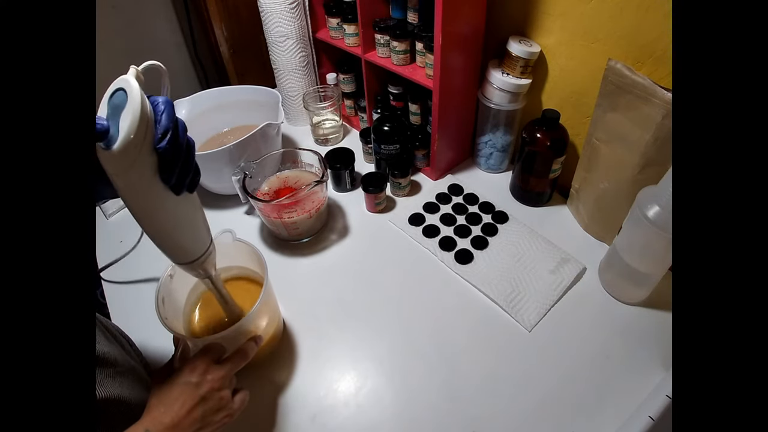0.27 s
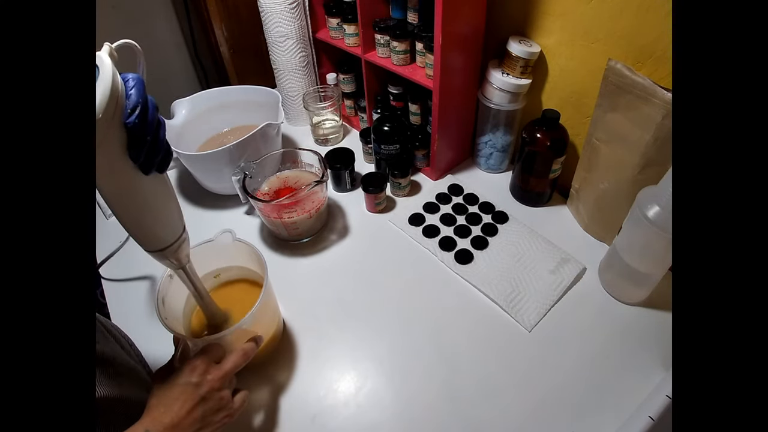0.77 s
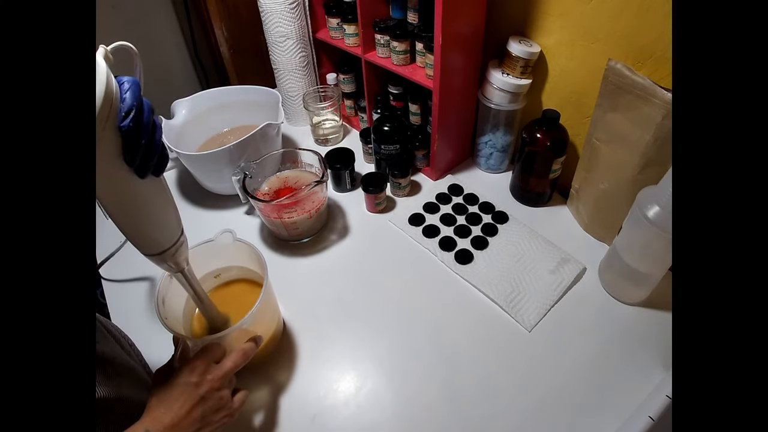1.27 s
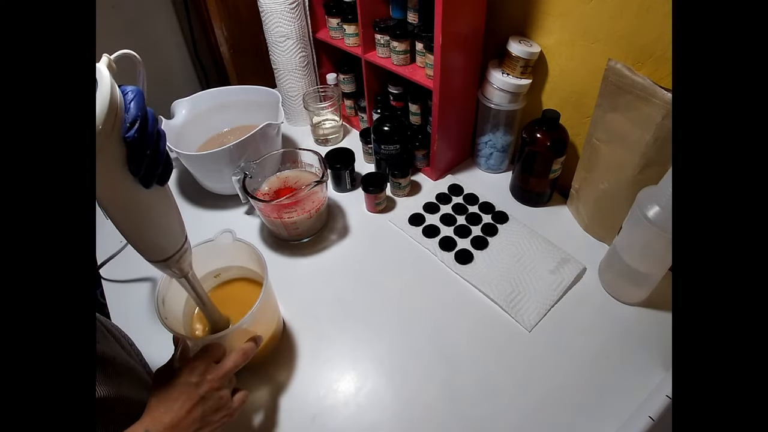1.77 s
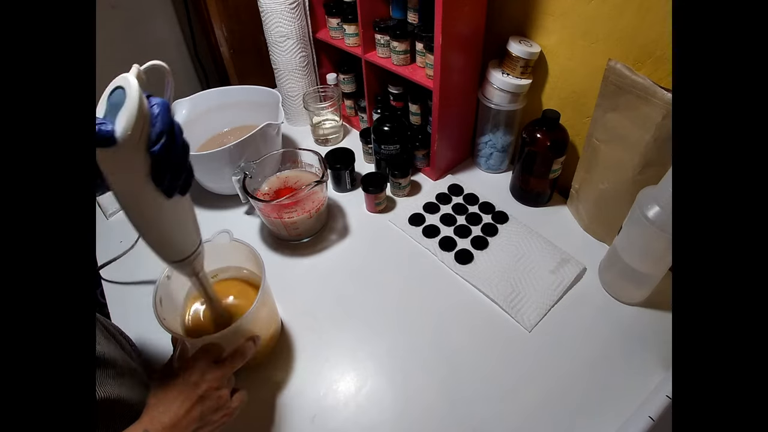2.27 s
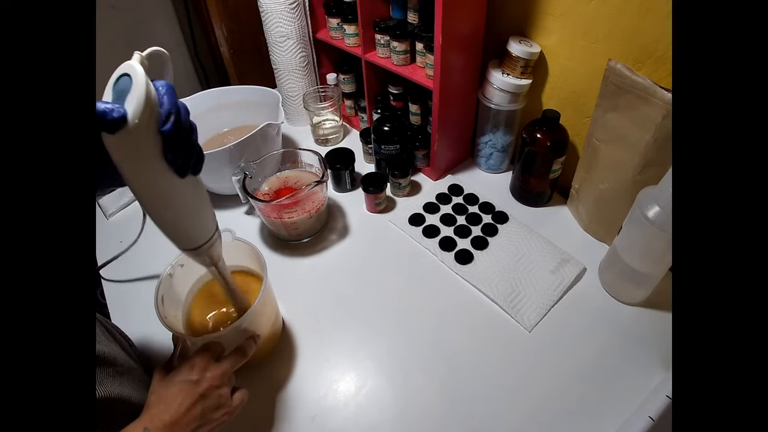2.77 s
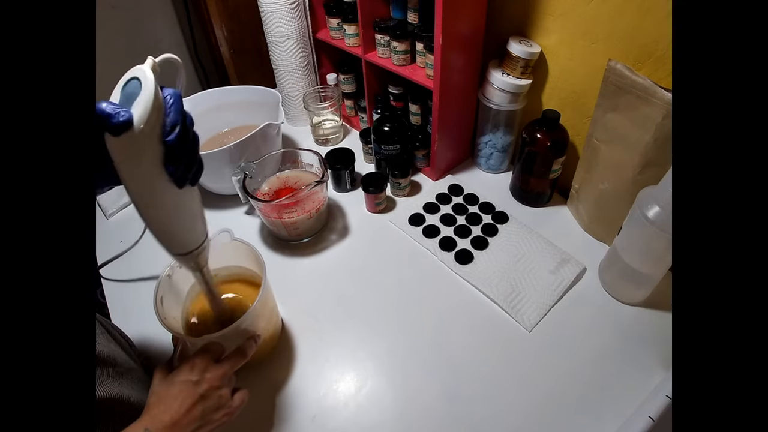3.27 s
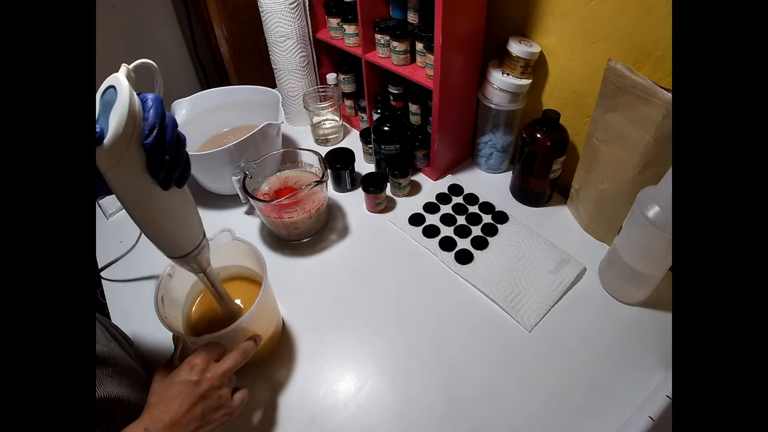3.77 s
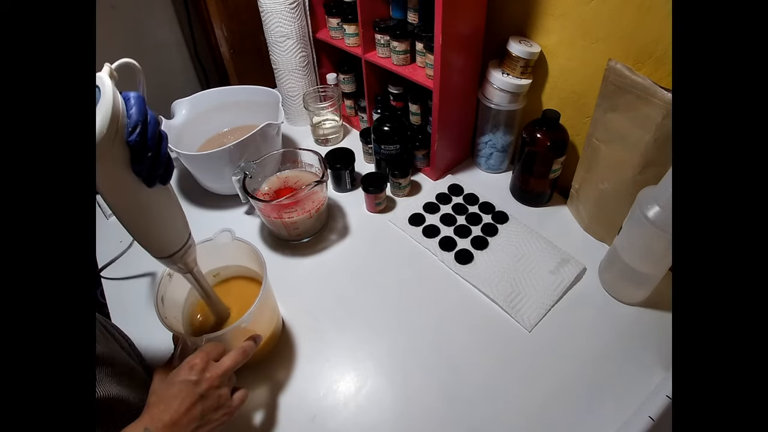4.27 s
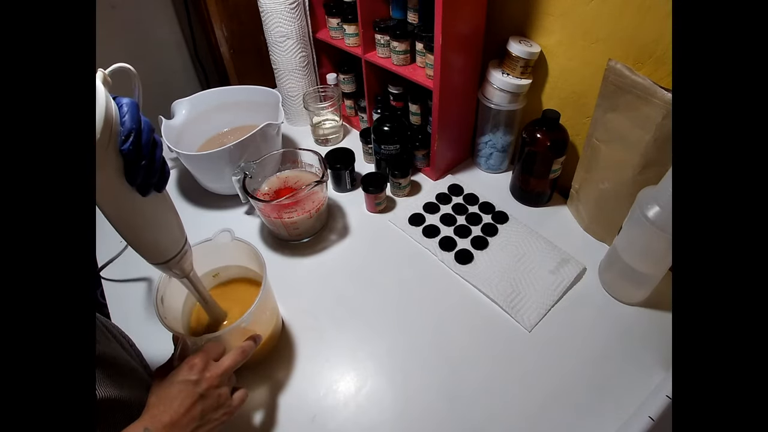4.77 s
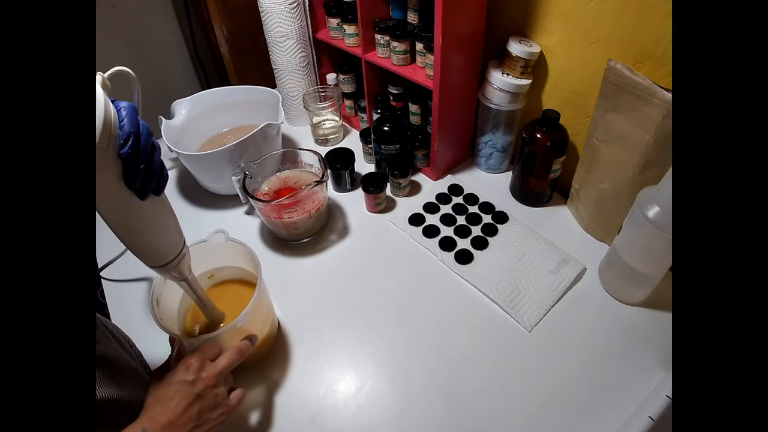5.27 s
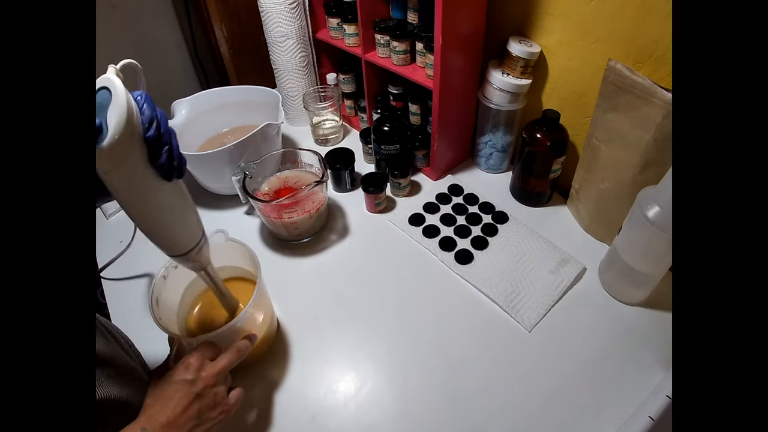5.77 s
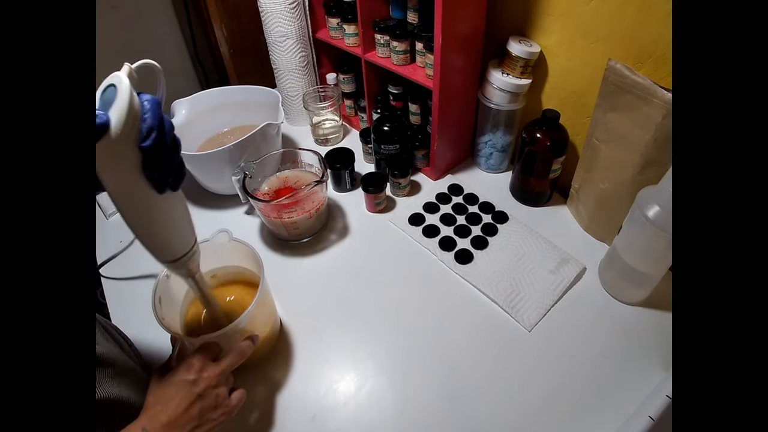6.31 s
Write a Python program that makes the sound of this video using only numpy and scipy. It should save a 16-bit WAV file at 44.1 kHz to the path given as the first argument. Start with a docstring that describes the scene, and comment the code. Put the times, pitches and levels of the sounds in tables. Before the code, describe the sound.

Close indoor blender pulses: clicks, buzzing hum and ringing plastic, then wet stirring with dull knocks, two more short bursts and a longer run.

```python
"""A stick blender is pulsed in a plastic pitcher of thick batter on a table in a small room.
Most presses click the switch; the shaft spins up with a hum of its turning orders and coasts down again.
The coupling rattles as filtered noise and clicks; the blade sets guard and pitcher wall ringing (resonators).
Between bursts the idle head is stirred round: it bumps and scrapes the pitcher and the batter squelches.
Direct sound dominates, as at a near microphone, over a short room tail, still air and handling rumble."""
import sys
import numpy as np
from scipy import signal
from scipy.fft import rfft, irfft
from scipy.io import wavfile
from scipy.ndimage import uniform_filter1d

SR = 44100
rng = np.random.default_rng(int(sys.argv[2]) if len(sys.argv) > 2 else 0)


def digitize_waveform(pressure):
    """Quantize a signal to 16-bit integers and store it at the path in sys.argv[1].

    Rows of a 2-D input are taken as channels; values are limited to [-1, 1].
    """
    field = np.atleast_2d(pressure).T
    bounded = np.clip(field, -1, 1)
    quanta = np.round(bounded * 32767).astype(np.int16)
    wavfile.write(sys.argv[1], SR, quanta)


N = 288414
TIME = np.arange(N) / SR  # s
FULL_SPEED_HZ = 168       # shaft speed at which the motor-driven levels hold
SCATTER_DB = 2            # spread of the mode strengths from blow to blow

# runs of the motor; the head sits differently in the batter each time:
# [on t/s, off t/s, top speed f/Hz, spin-up t/s, braking/(Hz/s), guard f/Hz, then relative levels:
#  rattle level/dB, guard level/dB, wall level/dB, unbalance level/dB, blade level/dB, overtones level/dB]
PRESSES = [ (-0.55, 0.306, 169, 0.05, 497, 848.5, -28.5, -23.5, -30.5, -31.5, -23.5, -39.5),
           (0.812, 1.06, 165.5, .038, 488, 868, -26.5, -20.5, -31, -29, -44, -32.5),
           (1.224, 1.475, 170, .045, 591, 867, -27.5, -24, -31.5, -26, -34.5, -44),
           (1.588, 1.815, 171, .05, 421, 872, -27.5, -23.5, -32.5, -27, -31, -35),
           (1.92, 2.125, 169, .05, 416, 865, -27.5, -21, -30.5, -33.5, -22, -39),
           (4.161, 4.373, 165, .043, 618, 858, -30.5, -31, -34, -26.5, -30, -55),
           (4.543, 4.757, 165, .055, 583.2, 862, -32, -30, -36.5, -24.5, -27, -32.5),
           (4.914, 5.75, 164.5, .07, 540, 845, -32, -29.5, -36, -22.5, -22, -30.5)]
# the guard knocks on the pitcher wall: [t/s, relative level/dB]
KNOCKS = [(0.844, -20.5), (1.663, -15), (2.42, -34), (2.518, -33), (2.707, -49), (2.741, -30.5),
          (2.865, -29), (2.945, -25), (3.052, -32.5), (3.099, -38), (3.149, -30.5), (3.239, -33),
          (3.28, -41), (3.396, -30.5), (3.438, -31), (3.616, -29.5), (5.866, -51), (6.065, -35),
          (6.202, -46), (6.232, -36.5), (6.492, -36)]
# resonances of the blade guard: [f/Hz, width f/Hz, relative level/dB]
GUARD_MODES = [(853, 20, 0), (888, 30, -8), (957, 45, -10)]
# resonances of the pitcher wall: [f/Hz, width f/Hz, relative level/dB]
WALL_MODES = [(340, 87, 2), (411.9, 25, 14), (463.4, 7.2, 6), (550, 54, -37.5), (770, 65, -32.5)]
# resonances of the pitcher's base: [f/Hz, width f/Hz, relative level/dB]
BASE_MODES = [(61.7, 25, -21.5), (119.2, 7.9, 4.5), (143.7, 11, 9.5), (179.3, 6.9, -5), (227.5, 4, -18),
              (321, 6.2, -2.5), (398, 67, -34.5)]
# spectrum of plastic scraping through batter: [f/Hz, relative level/dB]
SCRAPE_COLOUR = [(200, 5.5), (500, 0.5), (1100, -1.5), (1700, -3), (2700, -3), (4000, -11.5), (5000, -15.5),
                 (6100, -13.5), (7200, -30), (11000, -47), (15000, -59)]


def from_db(db):
    """Decibels to gain."""
    return 10 ** (np.asarray(db) / 20)


def rms_one(x):
    """Scale to unit power."""
    return x / np.sqrt(np.mean(x ** 2) + 1e-20)


def peak_one(x):
    """Scale to unit peak."""
    return x / np.abs(x).max()


def add(track, s, sound):
    """Mix a sound in at a time in seconds."""
    start = max(round(s * SR), 0)
    track[start:start + len(sound)] += sound[:N - start]


def drift(rate):
    """Slow chance with spread 1: noise low-passed at a rate in Hz."""
    step = 40  # samples between drawn values
    r = np.exp(-2 * np.pi * step * rate / SR)
    noise = rng.standard_normal(N // step + 2002)
    slow = signal.lfilter([1], [1, -2 * r, r * r], noise)[2000:]  # drop the settling
    return np.interp(np.arange(N) / step, np.arange(len(slow)), rms_one(slow))


def colour(x, spectrum):
    """Causal (minimum-phase) filter that follows a spectrum, built from its folded cepstrum."""
    size = 8192
    hz, db = np.transpose(spectrum)
    bin_hz = np.arange(size // 2 + 1) * SR / size
    gain = from_db(np.interp(np.log(bin_hz + 1), np.log(hz), db))
    cepstrum = irfft(np.log(gain))[:size // 2]
    cepstrum[1:] *= 2
    response = irfft(np.exp(rfft(cepstrum, size)))
    return signal.fftconvolve(x, response)[:len(x)]


def resonate(x, modes, scatter_db=0):
    """Parallel resonances with soft skirts; the point of contact scatters their strengths."""
    out = 0
    for hz, width, db in modes:
        r = np.exp(-np.pi * width / SR)
        poles = [1, -2 * r * np.cos(2 * np.pi * hz / SR), r * r]
        ring = signal.lfilter([1, 0, -1], poles, x + 1e-18)
        ring = signal.lfilter(*signal.butter(2, min(3.12 * hz, .4 * SR), fs=SR), ring)
        strength = from_db(db + scatter_db * rng.standard_normal())
        out = out + ring * (1 - r * r) / 2 * strength
    return out


def grains(per_s, unevenness):
    """Random clicks of either sign with log-normal sizes, at unit power."""
    born = rng.random(N) < per_s / SR
    sign = rng.choice([-1, 1], N)
    size = np.exp(unevenness * rng.standard_normal(N).clip(-2, 2))
    return rms_one(born * sign * size)


def contact(decay_s, grit):
    """One blow followed by a dying graze."""
    t = TIME[:SR // 4]
    force = grit * rng.standard_normal(len(t)) * np.exp(-t / decay_s)
    force[0] += 1
    return force


def wander(ring, depth):
    """Batter washing over a ringing body loads it and bends its pitch."""
    lead = uniform_filter1d(drift(8), SR // 10) * depth * SR / 50  # samples
    return np.interp(np.arange(N) + lead, np.arange(N), ring)


def steady_ring(modes, per_s, window_s, bend):
    """Many small blows keep a body ringing at a roughly even strength."""
    ring = wander(resonate(grains(per_s, unevenness=0.25), modes), bend)
    local_power = uniform_filter1d(ring ** 2, int(window_s * SR)).clip(0)
    return ring / np.sqrt(local_power + 1e-3 * np.mean(ring ** 2))


def partial(angle, rough, flutter_rate):
    """A tone of unit power; roughness trades its steady part for a fluttering one."""
    rough = np.clip(rough, 0, 1)
    steady = np.sqrt(2 * (1 - rough ** 2))
    in_phase = (steady + rough * drift(flutter_rate)) * np.sin(angle)
    return in_phase + rough * drift(flutter_rate) * np.cos(angle)


def per_press(column):
    """One column of the presses through time, each value held until the next press."""
    rows = np.array(PRESSES)
    latest = np.searchsorted(rows[1:, 0], TIME)
    return rows[latest, column]


def driven(speed, column, power):
    """Gain of a motor-driven sound: the level of the press, times a power of the speed."""
    level = from_db(uniform_filter1d(per_press(column), SR // 25))  # eased between presses
    return level * (speed / FULL_SPEED_HZ + 1e-6) ** power


def room(x, wet_db, t60, dull_hz):
    """Nearby walls and shelves return a short, duller tail: decaying noise after a 4 ms gap."""
    t = TIME[:SR // 2]
    tail = rng.standard_normal(len(t)) * from_db(-60 * t / t60) * (t > .004)
    band = signal.butter(1, [400, min(dull_hz, .45 * SR)], "band", fs=SR, output="sos")
    tail = signal.sosfilt(band, tail)
    return x + from_db(wet_db) * signal.fftconvolve(x, tail / np.sqrt(np.sum(tail ** 2)))[:N]


def still_air(level_db):
    """The background of the room is steady noise with a falling spectrum."""
    # spectrum of the background: [f/Hz, relative level/dB]
    air_colour = [(47, -17), (80, -10), (97, -7.5), (318, -5.5), (490, -15.5), (689, -15), (1800, -25),
                  (4300, -37.5), (5900, -29), (7300, -43.5), (9490, -41.5), (16100, -120)]
    return from_db(level_db) * rms_one(colour(rng.standard_normal(N), air_colour))


def handling(speed, gain_db, kick_db):
    """The hands rumble on the table, and the motor's torque kicks the handle as it spins up."""
    # strength of the hands' rumble: [t/s, relative level/dB]
    hand_levels = [(0.0, -45), (0.16, -35), (0.53, -59.5), (0.8, -52.5), (0.84, -58), (2.6, -59),
                   (3.42, -40.5), (4.13, -54.5), (4.22, -38), (4.33, -56), (5.85, -46), (6.54, -50)]
    # spectrum of the rumble: [f/Hz, relative level/dB]
    rumble_colour = [(20, 20), (35, -0.5), (60, 6), (85, -2.5), (130, -22)]
    gaining = np.gradient(speed).clip(0)
    torque = peak_one(uniform_filter1d(gaining, SR // 10, origin=SR // 20 - 1))  # averages backwards in time
    band = signal.butter(2, [15, 130], "band", fs=SR, output="sos")
    rumble = signal.sosfilt(band, colour(rng.standard_normal(N), rumble_colour))
    hands = from_db(gain_db + np.interp(TIME, *np.transpose(hand_levels)))
    return (hands + from_db(kick_db) * torque) * rms_one(rumble)


def stir_effort(column, waver_db):
    """Each spell of stirring sets in, holds with an unsteady hand and dies away."""
    # spells of stirring by hand: [start t/s, end t/s, rumble relative level/dB, scrape relative level/dB]
    stirs = [(2.254, 2.837, -39.5, -47), (2.873, 3.657, -33, -50), (5.841, 6.544, -36.5, -48.5)]
    attack_s, release_db_per_s = 0.034, 144
    spells = []
    for row in stirs:
        onset = ((TIME - row[0]) / attack_s).clip(0, 1)
        fall_db = release_db_per_s * (TIME - row[1]).clip(0)
        spells.append(from_db(row[column] - fall_db) * onset)
    return np.max(spells, axis=0) * from_db(waver_db * drift(3.8))


def splashing(gain_db, rise_s):
    """Each knock pushes a wave of batter along the wall, which swells quickly and subsides."""
    out, phase = np.zeros(N), TIME[:SR // 4] / rise_s
    for s, db in KNOCKS:
        add(out, s, from_db(db + gain_db) * phase * np.exp(1 - phase))
    return out


def stirring(drag, rumble_db, scrape_db, guard_db, wall_db):
    """The idle head drags over the pitcher floor through wet batter, in uneven slips."""
    base = steady_ring(BASE_MODES, per_s=290, window_s=0.17, bend=0.015)
    rumble = from_db(rumble_db) * stir_effort(column=2, waver_db=2.5) * base
    rub = grains(1800, unevenness=0.05) * np.exp(0.39 * drift(30))
    scrape = from_db(scrape_db) * rms_one(colour(rub, SCRAPE_COLOUR))
    body = from_db(guard_db) * rms_one(resonate(rub, GUARD_MODES))
    body = body + from_db(wall_db) * rms_one(resonate(rub, WALL_MODES))
    return rumble + drag * (scrape + wander(body, depth=0.064))


def smacks(drag, per_s, gain_db, muffle_hz):
    """Stirring breaks small bubbles at random, each size with its own pitch, muffled by the batter."""
    # small bubbles of the batter: [f/Hz, width f/Hz, relative level/dB]
    bubbles = [(1190, 150, -13.5), (1435, 100, 19), (2150, 130, 18), (2460, 250, -4), (2960, 350, -6),
               (3730, 150, 18), (4430, 770, -29), (5800, 770, -9)]
    pops = sum(resonate(grains(per_s, unevenness=0.53), [bubble]) for bubble in bubbles)
    pops = signal.sosfilt(signal.butter(4, muffle_hz, fs=SR, output="sos"), pops)
    return from_db(gain_db) * drag * rms_one(pops)


def squelches(gain_db, width_share, smack_share):
    """A pocket of air tears open with a smack and its cavity rings, heavily damped by the batter."""
    # air pockets burst in the batter: [t/s, relative level/dB, f/Hz]
    pockets = [(2.3557, -22.5, 3070), (2.4206, -32, 1970), (2.4375, -33, 2040), (2.744, -35.5, 2820),
               (2.7573, -35, 1990), (2.8777, -42, 2930), (2.938, -42, 2100), (2.9537, -29.5, 2550),
               (3.1742, -38.5, 3100), (3.2774, -37.5, 2100), (3.3228, -34, 3260), (6.232, -32.5, 1330),
               (6.2504, -35.5, 2090)]
    out = np.zeros(N)
    for s, db, hz in pockets:
        tear = colour(contact(decay_s=0.0071, grit=0.46), SCRAPE_COLOUR)
        cavity = peak_one(resonate(tear, [(hz, width_share * hz, 0)]))
        add(out, s, from_db(db + gain_db) * (cavity + smack_share * peak_one(tear)))
    return out


def bumps(gain_db, base_share):
    """The head lands on a cushion of batter, which bounces at its own pitch and rings the pitcher's base."""
    # the head bumps the pitcher floor: [t/s, peak level/dB, f/Hz]
    landings = [(0.14, -19.5, 138), (0.18, -26, 115.6), (0.839, -18, 119), (2.22, -25.5, 120),
                (2.452, -28, 146), (2.654, -26.5, 138), (2.856, -21.5, 137), (3.053, -28, 142),
                (3.1, -33, 130), (3.236, -20.5, 118), (3.396, -28, 154), (3.468, -24, 128),
                (3.52, -27, 174), (3.614, -22, 138), (4.184, -22, 113), (4.848, -24, 113.4),
                (5.87, -21, 121), (6.091, -26, 138.5), (6.299, -23.5, 141), (6.477, -24, 163)]
    out = np.zeros(N)
    for s, db, hz in landings:
        force = contact(decay_s=0.021, grit=0.072)
        cushion = peak_one(resonate(force, [(hz, 15, 0)]))
        base = peak_one(resonate(force, BASE_MODES, SCATTER_DB))
        add(out, s, from_db(db + gain_db) * peak_one(cushion + base_share * base))
    return out


def knocks(gain_db, wall_share, splat_share):
    """Harder knocks ring guard and wall and splat the batter."""
    out = np.zeros(N)
    for s, db in KNOCKS:
        force = contact(decay_s=0.01, grit=0.097)
        guard = peak_one(resonate(force, GUARD_MODES, SCATTER_DB))
        wall = peak_one(resonate(force, WALL_MODES, SCATTER_DB))
        splat = peak_one(colour(contact(decay_s=0.0048, grit=0.25), SCRAPE_COLOUR))
        add(out, s, from_db(db + gain_db) * (guard + wall_share * wall + splat_share * splat))
    return out


def clicks(events, gain_db, decay_s, grit, rise_s):
    """Hard plastic gives way, snaps and buzzes out briefly."""
    # spectrum of a plastic click: [f/Hz, relative level/dB]
    click_colour = [(300, -5), (1200, 0), (2500, 1), (4000, 0), (6200, -1), (7500, -11), (10000, -22),
                    (14000, -32)]
    out = np.zeros(N)
    for s, db in events:
        force = contact(decay_s, grit)
        force = force * (1 - 0.59 * np.exp(-TIME[:len(force)] / rise_s))  # softened onset
        add(out, s, from_db(db + gain_db) * peak_one(colour(force, click_colour)))
    return out


def plastic_ticks():
    """Small ticks of plastic and spatter are short clicks."""
    # ticks: [t/s, peak level/dB]
    tick_events = [(0.697, -53), (2.533, -43.5), (2.9392, -43), (3.325, -48), (3.362, -50), (3.6994, -57),
                   (4.079, -50), (4.3794, -23.5)]
    return clicks(tick_events, gain_db=0, decay_s=0.0097, grit=0.38, rise_s=0.0011)


def switch_snaps():
    """The switch snaps shut with a grittier click."""
    # snaps: [t/s, relative level/dB]
    snap_events = [(0.817, -20), (1.2268, -15.5), (1.588, -16), (4.1628, -14.5), (4.5447, -15),
                   (4.9106, -15)]
    return clicks(snap_events, gain_db=-4.5, decay_s=.008, grit=0.99, rise_s=0.0017)


def shaft_speed():
    """Under power the shaft closes in on its top speed; let go, the batter brakes it at a steady rate."""
    speed = np.zeros(N)
    for on, off, top_hz, spin_up_s, braking, *_ in PRESSES:
        powered = (np.minimum(TIME, off) - on).clip(0)
        speed_at_press = np.interp(on, TIME, speed)
        reached = top_hz + (speed_at_press - top_hz) * np.exp(-powered / spin_up_s)
        coasting = (reached - braking * (TIME - off).clip(0)).clip(0)
        speed = np.where(TIME < on, speed, coasting)
    return speed


def shaft_angle(speed, wobble):
    """The shaft turns at its speed, jostled by lumps in the batter."""
    return 2 * np.pi * np.cumsum(speed * (1 + wobble * drift(26.2))) / SR


def swirl(speed):
    """The whirling batter lags behind the blade and rumbles on the pitcher's base."""
    lag_s, level_db = 0.086, -38
    r = np.exp(-1 / (lag_s * SR))
    flow = signal.lfilter([1 - r], [1, -r], speed / FULL_SPEED_HZ, zi=[r])[0]
    return from_db(level_db) * flow ** 1.8 * steady_ring(BASE_MODES, per_s=250, window_s=0.025, bend=0.06)


def grazing(column):
    """The spinning head grazes the pitcher; each graze swells and fades in one arch."""
    # grazes: [t/s, length t/s, guard relative level/dB, wall relative level/dB]
    grazes = [(0.055, 0.11, -18, -36), (0.162, 0.046, -18.5, -29.5), (0.883, .05, -19, -20),
              (1.015, .05, -30, -27), (1.093, 0.083, -20.5, -55), (1.292, 0.065, -14, -29),
              (1.343, .05, -22, -24.5), (1.49, 0.22, -29.5, -45.5), (1.649, 0.066, -15.5, -37.5),
              (1.786, 0.15, -20, -31), (1.932, 0.049, -21.5, -34), (2.08, 0.041, -28, -18.5),
              (4.761, 0.052, -45, -25.5), (5.101, 0.095, -23.5, -41), (5.275, 0.048, -28, -44),
              (5.71, 0.085, -49, -38)]
    out = 0
    for row in grazes:
        progress = ((TIME - row[0]) / row[1]).clip(0, 1)
        out = out + from_db(row[column]) * np.sin(np.pi * progress) ** 2
    return out


def churn(speed, guard_db, wall_db):
    """The blade flings batter against its guard and the pitcher wall; both ring harder where the head grazes."""
    # reading the guard's ring faster or slower tunes it to the pitch of each press
    tuning = np.cumsum(per_press(column=5) / GUARD_MODES[0][0])
    guard_ring = steady_ring(GUARD_MODES, per_s=360, window_s=0.025, bend=0.001)
    guard_ring = np.interp(tuning, np.arange(N), guard_ring)
    wall_ring = steady_ring(WALL_MODES, per_s=400, window_s=0.054, bend=0.028)
    guard = np.hypot(driven(speed, column=7, power=2.74), grazing(column=2)) * guard_ring
    wall = np.hypot(driven(speed, column=8, power=1.85), grazing(column=3)) * wall_ring
    return from_db(guard_db) * guard + from_db(wall_db) * wall


def wall_song(angle, speed, gain_db, rough):
    """The third order sweeps through the pitcher wall's resonances and makes them sing on the way."""
    song = resonate(partial(3 * angle, rough, flutter_rate=16), WALL_MODES)
    return from_db(gain_db) * driven(speed, column=8, power=4.4) * song


def coupling(angle, speed, rattle_db, housing_db, hiss, throb, flicker):
    """The loose coupling chatters with the turning, harder under torque, over brush hiss, into the housing."""
    # spectrum of the rattle: [f/Hz, relative level/dB]
    rattle_colour = [(70, -17.5), (280, -5.5), (450, 0), (700, -22), (1100, -4.5), (1600, -2.5), (3200, -3),
                     (4700, -14), (5500, -7.5), (6300, -13), (7200, -24.5), (10000, -36), (11500, -49),
                     (14500, -70)]
    # resonances of the motor housing: [f/Hz, width f/Hz, relative level/dB]
    housing_modes = [(1410, 110, -16.5), (1970, 120, -2), (2100, 54, -2.5), (1960, 44, 1.5),
                     (2760, 450, -16), (3480, 82, -13.5), (5520, 280, -25.5)]
    torque_db = 7.5        # extra rattle when the motor pulls from a standstill
    coast_db = -1.5        # the coupling rattles less once the motor stops pulling
    housing_follows = .25  # share of the load on the blade guard that reaches the housing
    beat = np.exp(throb * (np.cos(angle) + np.cos(2 * angle + 1)) + flicker * drift(33))
    chatter = grains(2500, unevenness=0.33) + hiss * rng.standard_normal(N)
    force = rms_one(chatter * beat)
    load_db = uniform_filter1d(per_press(column=7), SR // 25)
    housing_gain = from_db(housing_db + housing_follows * (load_db - load_db.mean()))
    housing = housing_gain * rms_one(resonate(force, housing_modes))
    rattle = from_db(rattle_db) * rms_one(colour(force, rattle_colour))
    effort_db = np.where(TIME > per_press(column=1), coast_db, torque_db * (1 - speed / FULL_SPEED_HZ))
    gain = driven(speed, column=6, power=2.58) * from_db(uniform_filter1d(effort_db, SR // 30))
    return gain * (rattle + housing)


def hum(angle, speed, first_db, blade_db, overtone_db, blade_masking, masking):
    """Unbalance sounds once a turn, the two blades twice; overtones need an even bite and roughen with order."""
    # hum from the third order up: [order, relative level/dB]
    overtones = [(3, -9), (4, 6.5), (5, 3.5), (6, -2), (7, -4.5), (8, -2.5), (9, -5), (10, -10.5),
                 (11, -23.5), (12, -48.5)]
    # the blade bites unevenly after each press until a steady vortex forms
    rough_bite, smooth_bite = 0.76, 0.16  # roughness 0-1
    vortex_s, vortex_spread_s, vortex_decay_s = 0.17, 0.075, 0.036
    # the vortex first swells this long after a press, then again and again
    surge_s, surge_period_s, surge_db = 0.28, 0.55, 2
    fling_db_per_s = 11  # clinging batter flies off and the unbalance eases
    rough_order = 2.4    # the order that is as rough as the bite; higher ones are rougher
    age = TIME - per_press(column=0)
    since_release = (TIME - per_press(column=1)).clip(0)
    vortex = .5 + .5 * np.tanh((age - vortex_s) / vortex_spread_s)
    vortex = vortex * np.exp(-since_release / vortex_decay_s)
    bite = np.clip(rough_bite + (smooth_bite - rough_bite) * vortex, 0, 1)
    surge = from_db(surge_db * np.cos(2 * np.pi * (age - surge_s) / surge_period_s))

    first = from_db(first_db - fling_db_per_s * age) * driven(speed, column=9, power=3.15)
    first = first * partial(angle, 0.72 * bite, flutter_rate=26)
    blade = from_db(blade_db) * np.exp(-blade_masking * bite) * driven(speed, column=10, power=3.4)
    blade = blade * partial(2 * angle, bite, flutter_rate=13.9)
    upper = np.zeros(N)
    for order, db in overtones:
        phase = round(order) * angle + 2 * np.pi * rng.random()
        upper += from_db(db) * partial(phase, bite * order / rough_order, flutter_rate=7.5)
    upper *= from_db(overtone_db) * np.exp(-masking * bite) * driven(speed, column=11, power=8.2)
    return first + surge * (blade + upper)


def scene():
    """Motor, batter and hand work in the room, over still air and handling rumble."""
    speed = shaft_speed()
    angle = shaft_angle(speed, wobble=0.005)

    hand = bumps(gain_db=0, base_share=0.51)
    hand += knocks(gain_db=-3.0, wall_share=0.89, splat_share=0.33)
    hand += switch_snaps() + plastic_ticks()

    drag = np.hypot(stir_effort(column=3, waver_db=-0.5), splashing(gain_db=-19.5, rise_s=0.017))
    batter = churn(speed, guard_db=-3, wall_db=-0.5) + swirl(speed)
    batter += stirring(drag, rumble_db=-2.5, scrape_db=-8.5, guard_db=-5.0, wall_db=-5.5)
    batter += squelches(gain_db=-1.5, width_share=0.25, smack_share=0.14)
    batter += smacks(drag, per_s=32, gain_db=-16.5, muffle_hz=4550)  # rate for each bubble size

    motor = hum(angle, speed, first_db=0.0, blade_db=3.0, overtone_db=-2.0, blade_masking=1.73, masking=3.6)
    motor += coupling(angle, speed, rattle_db=-2.5, housing_db=-10, hiss=1.0, throb=0.05, flicker=0.16)
    motor += wall_song(angle, speed, gain_db=-5.5, rough=.5)

    in_room = room(motor + batter + hand, wet_db=-16.0, t60=0.16, dull_hz=4900)
    background = still_air(level_db=-63.5) + handling(speed, gain_db=-5, kick_db=-47.5)
    return (in_room + background)[None]


def record(dry):
    """The top of the band is cut steeply above 15.1 kHz."""
    return signal.sosfilt(signal.ellip(10, .1, 80, 15100, fs=SR, output="sos"), dry)


dry = scene()
out = record(dry)
digitize_waveform(out)
```